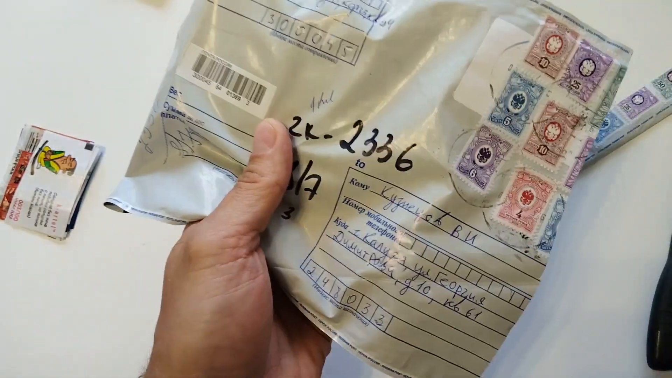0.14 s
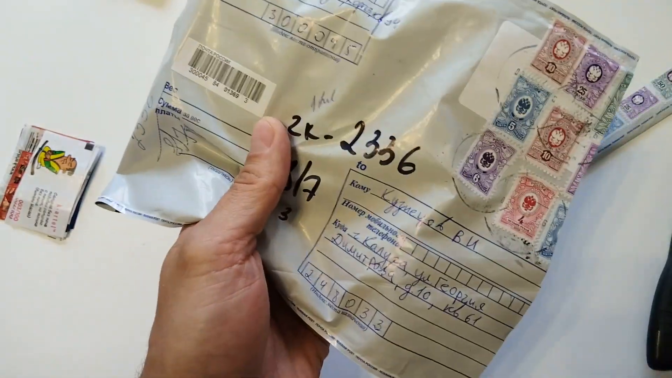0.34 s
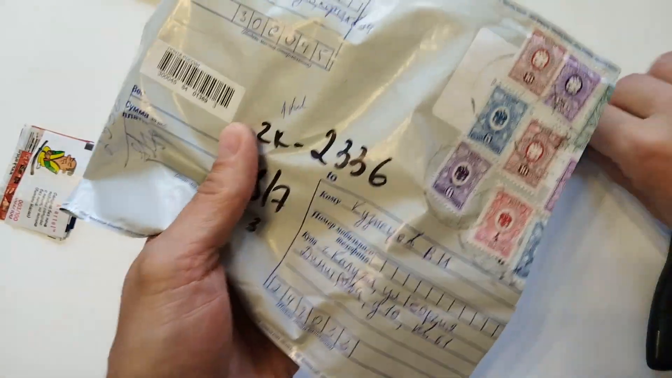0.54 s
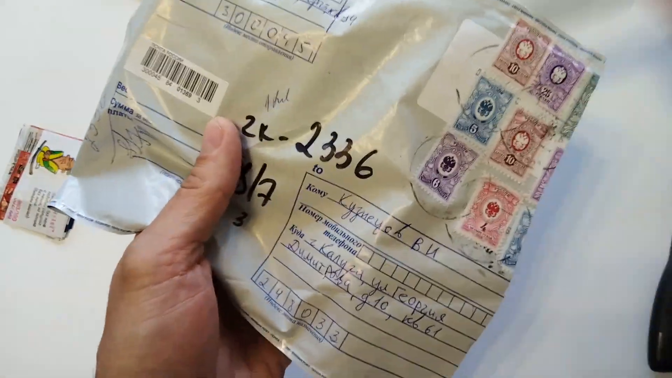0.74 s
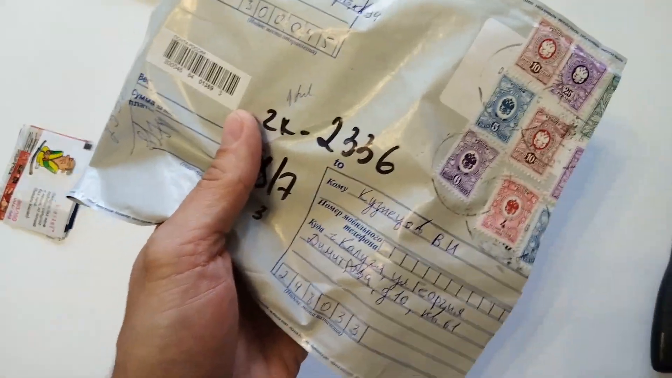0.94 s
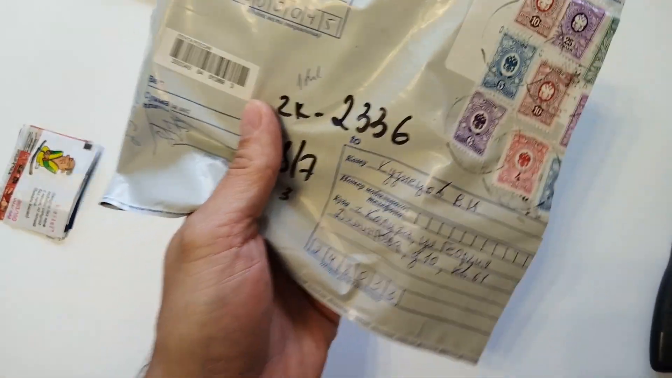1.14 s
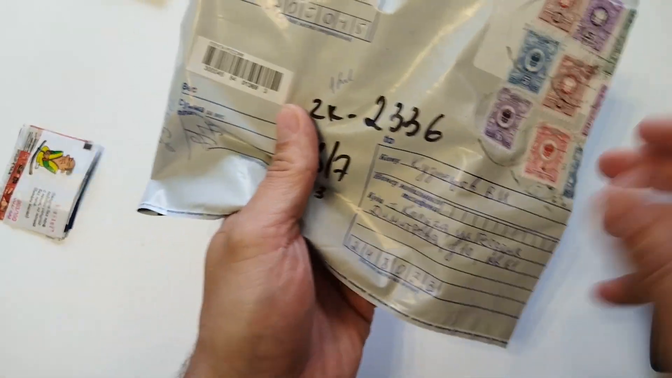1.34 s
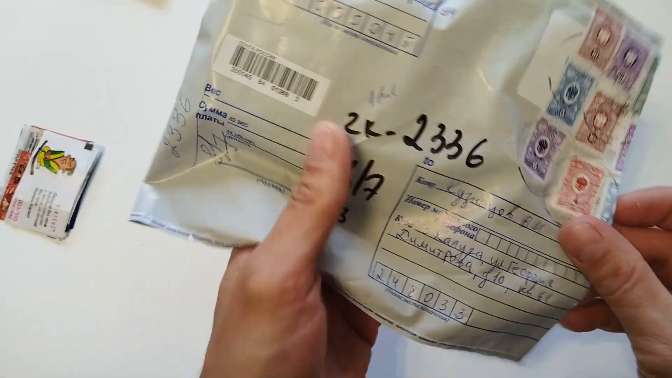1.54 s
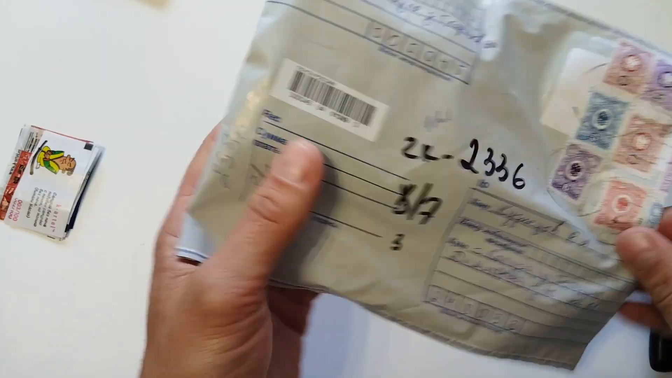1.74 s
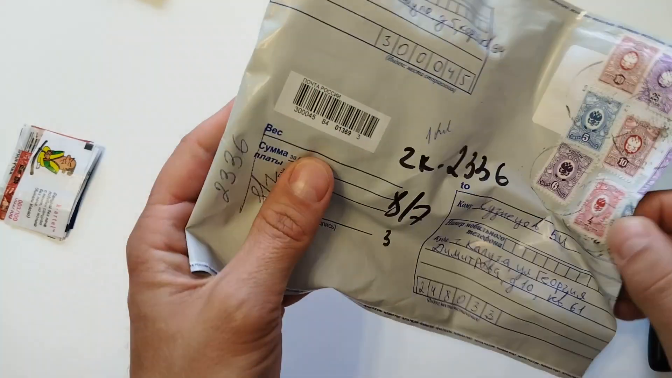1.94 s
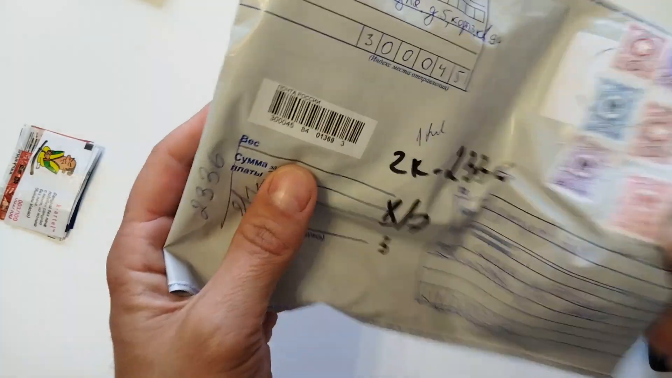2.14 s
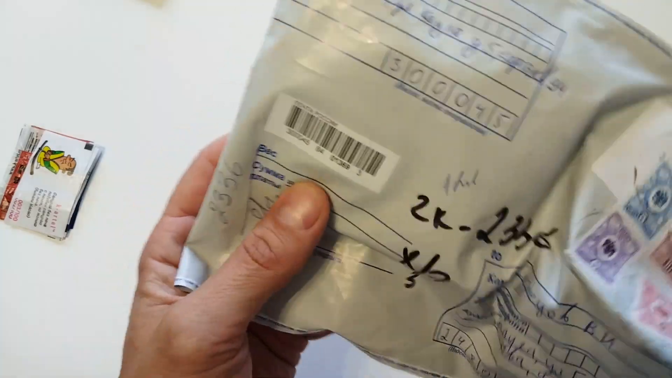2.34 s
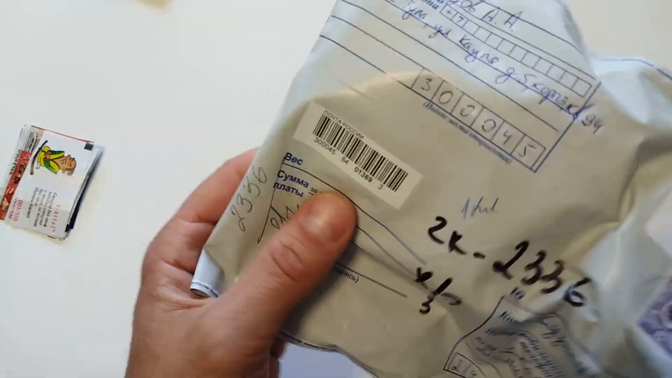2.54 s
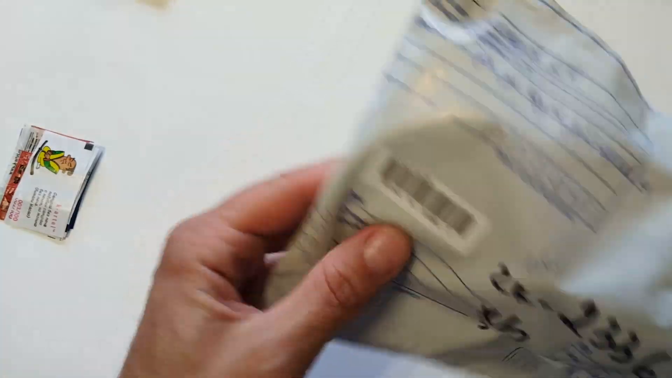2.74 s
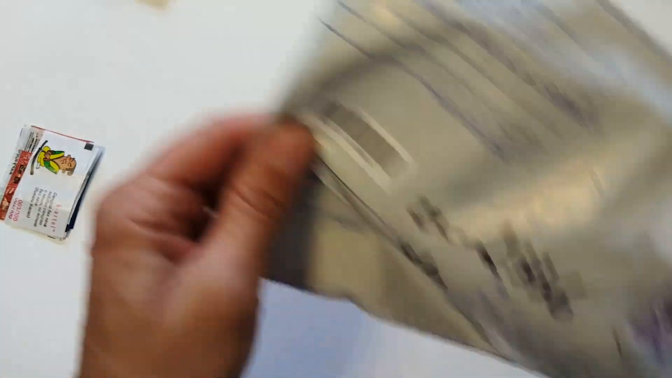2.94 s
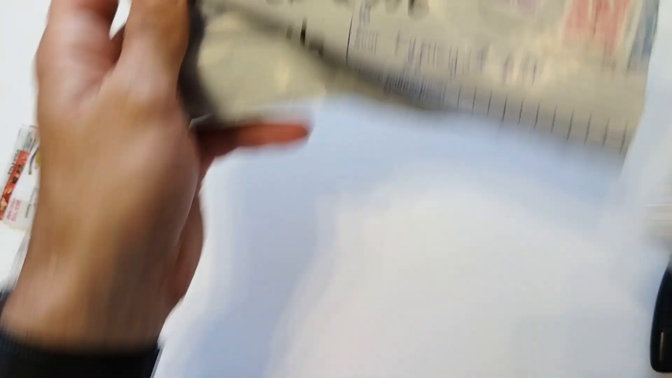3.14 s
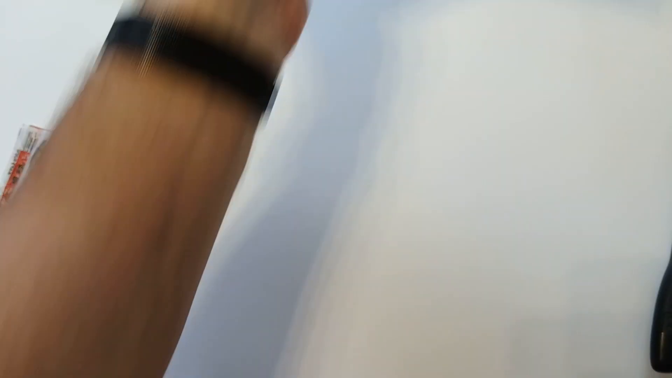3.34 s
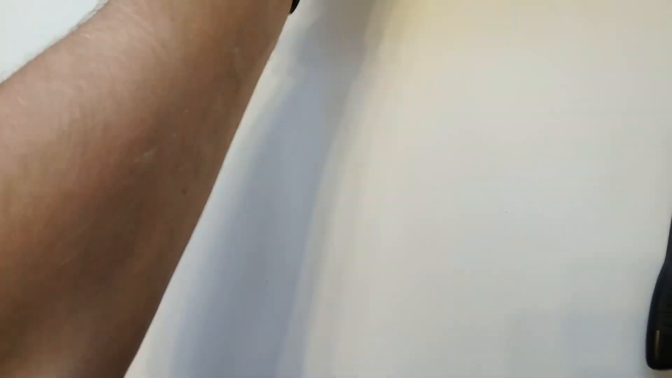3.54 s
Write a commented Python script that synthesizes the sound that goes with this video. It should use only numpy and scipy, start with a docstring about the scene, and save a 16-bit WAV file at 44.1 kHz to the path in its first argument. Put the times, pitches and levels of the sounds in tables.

```python
"""Stiff film rubs softly over a faint hum, then sharp clicks begin: a plastic mailer is turned over in the hands.
It is close to the microphone, above a table in a small bare room. Early on, something hard is put down on
the table: it clicks, rings the top and skids in a rush of small slips. Rubbing is filtered noise plus many tiny
clicks; creases snap as short noise bursts with a ringing note; slack parts pop with dull, hollow notes; a hollow
swish comes near the end. The clicks, pops, crackles, knocks and skid leave a short tail in the room."""
import sys
import numpy as np
from scipy import signal
from scipy.fft import rfft, irfft
from scipy.io import wavfile

SR = 44100
rng = np.random.default_rng(int(sys.argv[2]) if len(sys.argv) > 2 else 0)


def unload_audio(sound):
    """Save the sound as a 16-bit wav file, at the path given as the first command line argument."""
    columns = np.transpose(np.atleast_2d(sound))
    # keep every value between -1 and 1, then stretch to whole-number steps
    steps = np.round(np.clip(columns, -1, 1) * 32767)
    wavfile.write(sys.argv[1], SR, steps.astype(np.int16))


N = 160965
T = np.arange(N) / SR
MIC_LAG_S = 0.00017   # sets how far arrival times spread between the two microphones


def from_db(db):
    """Turn decibels into a gain."""
    return 10 ** (np.asarray(db) / 20)


def rms_one(x):
    """Scale a sound to an rms of one."""
    return x / np.sqrt(np.mean(x ** 2) + 1e-20)


def at_hz(points, hz):
    """Read a table between its points, on a log-frequency axis."""
    f, v = np.transpose(points)
    return np.interp(np.log(hz + 1e-3), np.log(f), v)


def band(x, low, high, order=3):
    """Keep only the frequencies between low and high."""
    sos = signal.butter(order, [low, high], "band", fs=SR, output="sos")
    return signal.sosfilt(sos, x + 1e-18)


def coloured(x, spectrum):
    """Shape a sound with a (Hz, dB) curve, through a minimum-phase filter that never rings early."""
    size = 4096
    gain = from_db(at_hz(spectrum, np.fft.rfftfreq(size, 1 / SR)))
    cepstrum = irfft(np.log(gain))
    # Folding the second half onto the first makes the filter causal.
    cepstrum[1:size // 2] *= 2
    cepstrum[size // 2 + 1:] = 0
    response = irfft(np.exp(rfft(cepstrum)))
    return signal.fftconvolve(np.atleast_2d(x), response[None], axes=1)[:, :x.shape[-1]]


# How alike left and right are. Each row: frequency in Hz, likeness from 0 (unrelated) to 1 (the same).
LIKENESS = [(60, 0.92), (130, 0.88), (290, 0.69), (640, 0.65), (1400, 0.27), (3100, 0.12), (15000, 0)]


def diffuse(size):
    """Stereo noise from all around: alike in the bass, unrelated in the treble."""
    mid, side = rfft(rng.standard_normal((2, size)))
    alike = np.clip(at_hz(LIKENESS, np.fft.rfftfreq(size, 1 / SR)), -1, 1)
    spectrum = np.sqrt(1 + alike) * mid + np.sqrt(1 - alike) * side * [[1], [-1]]
    return rms_one(irfft(spectrum, size))


def drift(rate):
    """A random wander with an rms of one, through this many new values a second."""
    knots = rng.standard_normal(2000)
    return rms_one(np.interp(T * rate, np.arange(len(knots)), knots))


def ring(clicks, hz, t60):
    """Each unit click sets off a sine of height about 1 that falls by 60 dB in t60 seconds."""
    r = 10 ** (-3 / (t60 * SR))
    w = 2 * np.pi * hz / SR
    return signal.lfilter([0, np.sin(w)], [1, -2 * r * np.cos(w), r * r], clicks + 1e-18)


def resonate(x, rings):
    """Feed a sound to side-by-side resonances of (Hz, width Hz, dB), added with alternating sign."""
    out = 0
    for k, (hz, width_hz, db) in enumerate(rings):
        b, a = signal.iirpeak(hz, hz / width_hz, fs=SR)
        out = out + (-1) ** k * from_db(db) * signal.lfilter(b, a, x + 1e-18)
    return out


def add(track, s, sound):
    """Mix a sound into a track at a time in seconds."""
    i = int(s * SR)
    track[i:i + len(sound)] += sound[:max(len(track) - i, 0)]


# Tone of the room air. Each row: frequency in Hz, relative level in dB per Hz.
AIR = [(30, -41), (60, -13.5), (120, -5.5), (240, 2.5), (350, -11), (480, -7), (720, -19), (2500, -29),
       (7600, -31.5), (9200, -55), (11300, -28.5), (15000, -27.5)]
# The steady hum. Each row: frequency in Hz, average rms level in dB.
HUM = [(194, -68), (242.2, -60), (484.5, -63)]
AIR_DB = -56


def background():
    """Room air is shaped noise; the faint hum is a few sines that waver together in level."""
    hum = 0
    for hz, db in HUM:
        hum = hum + np.sqrt(2) * from_db(db) * np.sin(2 * np.pi * (hz * T + rng.random()))
    air = from_db(AIR_DB) * rms_one(coloured(diffuse(N), AIR))
    return air + hum * from_db(1.1 * drift(5.2))


PATCHY_DB, PATCHES_PER_S = 4.5, 22   # as the sheet bends, its resonances come and go


def patchy(x, low, high, count=5):
    """Split a band into strips that swell and fade on their own as the sheet bends."""
    edges = np.geomspace(low, high, count + 1)
    out = 0
    for k in range(count):
        strip = band(x[k % 2], edges[k], edges[k + 1], order=2)   # the two noises take turns
        out = out + strip * from_db(PATCHY_DB * drift(PATCHES_PER_S))
    return rms_one(out)


CRACKLES_PER_S, CRACKLE_SPREAD_DB = 520, 3


def creases(size=6000):
    """Tiny creases give way at random: sample, strength and centre pitch of each, and its two mic delays."""
    gaps_s = rng.exponential(1 / CRACKLES_PER_S, size)
    born = (np.cumsum(gaps_s) * SR).astype(int)
    strength = from_db(CRACKLE_SPREAD_DB * np.minimum(rng.exponential(1, size), 2))
    centre_hz = np.exp(rng.uniform(np.log(100), np.log(16000), size))
    lags = (rng.random((2, size)) * MIC_LAG_S * SR).astype(int)
    return born, strength, centre_hz, lags


# Colour of the film, for its rubbing and for the sharp clicks. Each row: frequency in Hz, level in dB.
FILM = [(60, -7), (110, -0.5), (270, -4), (460, -2), (560, -3.5), (820, 2), (1070, 0.5), (1800, 1.5),
        (2500, 1.5), (2950, -4.5), (3700, -4), (5500, -4.5), (7400, -4), (9400, -19), (11600, -13),
        (13300, -19.5), (15000, -20)]
CRACKLE_CYCLES = 10.9   # cycles for a click's ringing to fall by 60 dB
CRACKLE_OCTAVES = .55   # spread of one tiny crease's spectrum around its pitch


def crackle(tiny, low, high, count=10):
    """Each tiny crease is one click that rings the film's modes around its own pitch, with its own strengths."""
    born, strength, centre_hz, lags = tiny
    out = np.zeros((2, N))
    for hz in np.geomspace(low, high, count * 2 + 1)[1::2]:
        shared, own = rng.standard_normal(len(born)), rng.standard_normal((2, len(born)))
        alike = np.clip(at_hz(LIKENESS, hz), 0, 1)
        clumps = from_db(PATCHY_DB * drift(PATCHES_PER_S)[np.minimum(born, N - 1)])
        nearness = np.exp(-.5 * (np.log2(hz / centre_hz) / CRACKLE_OCTAVES) ** 2)
        reach = strength * clumps * nearness
        for side in range(2):
            weight = reach * (np.sqrt(alike) * shared + np.sqrt(1 - alike) * own[side])
            # Clicks past the end of the scene fall into slot N, which is dropped.
            clicks = np.bincount(np.minimum(born + lags[side], N), weight, N)[:N]
            out[side] += hz * ring(clicks, hz, CRACKLE_CYCLES / hz)
    return rms_one(band(coloured(out, FILM), low, high))


# How hard the film rubs, before flutter and the hiss and crackle shares below.
# Each row: time in seconds, then level in dB in each of the four rub bands.
RUB = [(0, -61, -47.5, -45.5, -49.5), (0.171, -61, -56, -62.5, -79), (0.26, -53, -53.5, -36, -46),
       (0.72, -69, -57, -56.5, -72), (0.848, -43, -47, -36.5, -44.5), (0.92, -50.5, -62, -52.5, -62),
       (1.0, -48, -56, -42.5, -50), (1.121, -63, -64.5, -76, -90), (1.22, -68, -73.5, -66, -60),
       (1.313, -75, -73, -66, -71), (1.321, -58, -51, -41.5, -44.5), (1.42, -58.5, -52, -37, -39.5),
       (1.57, -70, -56, -59, -70), (1.72, -67, -64.5, -61, -59), (1.819, -50.5, -45.5, -45, -51),
       (1.89, -46, -38.5, -34.5, -39.5), (2.05, -59, -41, -41, -46.5), (2.15, -57, -45, -55.5, -64),
       (2.23, -57.5, -40, -34.5, -40), (2.39, -50.5, -45.5, -43.5, -54.5),
       (2.551, -40, -29.5, -35.5, -44.5), (2.71, -45, -49, -54, -43), (2.771, -34.5, -27.5, -24, -38.5),
       (2.84, -53.5, -35.5, -46, -46.5), (2.951, -40, -36, -37, -46), (3.03, -46, -33, -32.5, -39.5),
       (3.11, -41, -36, -38, -52.5), (3.23, -44.5, -33.5, -34, -38.5), (3.362, -45, -36, -31, -39),
       (3.499, -54, -52.5, -45.5, -58.5), (3.65, -66, -60, -54.5, -63)]
# The rub bands. Each row: lowest and highest frequency in Hz.
RUB_BANDS_HZ = [(70, 500), (500, 2800), (2800, 8000), (8000, 15500)]
# Share of smooth friction: one level in dB for each rub band.
HISS_DB = [-2.5, -7.5, -5.5, -1.5]
# Share of tiny creases: one level in dB for each rub band.
CRACKLE_DB = [-4.5, -5.5, -8, -5]
FLUTTER_DB = 1.83


def rubbing():
    """Film slides over fingers and over itself: returns the smooth hiss and the crackle that rides on it."""
    s, *levels = np.transpose(RUB)
    friction = [coloured(diffuse(N), FILM) for _ in range(2)]
    flutter = from_db(FLUTTER_DB * drift(70))
    hiss = grains = 0
    tiny = creases()
    for (low, high), db, hiss_db, crackle_db in zip(RUB_BANDS_HZ, levels, HISS_DB, CRACKLE_DB):
        gain = from_db(np.interp(T, s, db)) * flutter
        hiss = hiss + gain * from_db(hiss_db) * patchy(friction, low, high)
        grains = grains + gain * from_db(crackle_db) * crackle(tiny, low, high)
    return hiss, grains


# Sharp broadband clicks: creases snapping, and four hard contacts of the object on the table (0.29 to 0.51 s).
# Each row: time of the pulse in seconds, pitch in Hz, left minus right in dB,
# then level in dB in each of the four click bands (as rms over 4 ms, before panning).
CLICKS = [(0.2109, 7940, -2, -42, -56, -26.5, -27), (0.2927, 2580, 5, -26, -28.5, -26.5, -25.5),
          (0.3093, 920, -5.5, -40, -26.5, -28.5, -33), (0.394, 1190, 4, -39, -34, -29.5, -34),
          (0.4393, 1150, 2.5, -18.5, -21.5, -23, -24), (0.512, 910, 3, -23.5, -50, -31, -29.5),
          (0.656, 7400, 6, -61, -44, -38, -39.5), (0.7455, 5700, 4, -71, -70, -39, -37.5),
          (1.0194, 6700, 4, -78, -76, -44.5, -40), (1.417, 5550, -1, -57, -47, -39, -31.5),
          (1.4558, 7870, -0.5, -45, -40, -23, -25.5), (1.8499, 7100, -2, -35.5, -46.5, -34, -33),
          (1.8641, 6270, 1.5, -33, -31.5, -24, -29.5), (1.9146, 4480, -1.5, -34, -35, -30.5, -35),
          (2.0005, 4520, 4, -35.5, -36, -32.5, -54), (2.0171, 3730, 2, -37, -44, -37.5, -52),
          (2.1034, 1690, 0, -43, -28, -30, -43), (2.1718, 2800, -1, -35, -34, -35.5, -40),
          (2.191, 3530, 0, -37.5, -50, -30.5, -47), (2.2107, 11200, -1, -45, -36, -27.5, -17.5),
          (2.2205, 6460, -4, -40, -38, -25.5, -42), (2.2475, 4140, 0, -53, -44, -31, -30),
          (2.3418, 4330, -1.5, -37.5, -37, -28, -38), (2.429, 3220, -1, -38, -36, -31.5, -45),
          (2.4407, 1720, 2, -45, -30, -27.5, -42), (2.517, 1780, 2, -31.5, -35, -34, -39),
          (2.5986, 1565, -2.5, -43, -17, -28.5, -44), (2.617, 1720, 3, -32.5, -24.5, -26.5, -26),
          (2.6409, 5650, -1.5, -28.5, -29, -14.5, -28), (2.7617, 2340, -3, -29.5, -32, -49, -33),
          (2.7706, 1810, -3, -29, -30, -38, -42), (2.774, 1870, 3, -46, -25.5, -24, -26.5),
          (2.835, 2320, -10, -40, -31.5, -36, -46), (2.8651, 2250, 0, -49, -30, -31, -27),
          (2.9043, 5470, 2.5, -27, -24.5, -20.5, -29.5), (2.9591, 1650, 1.5, -34, -25.5, -42, -55),
          (2.9709, 680, 0.5, -26.5, -29.5, -43, -53), (3.0785, 1950, 7, -52, -27, -36, -46),
          (3.1436, 7150, 1, -31, -21, -18, -47), (3.147, 3280, 1, -42, -32, -23, -47),
          (3.222, 1240, 4, -37, -30, -31, -48), (3.2895, 5650, -2, -49, -32, -23.5, -23),
          (3.5904, 11200, 7.5, -66, -57, -42, -39), (3.636, 7900, 10, -73, -71, -49, -42)]
# The click bands. Each row: lowest and highest frequency in Hz.
CLICK_BANDS_HZ = [(400, 1200), (1200, 2800), (2800, 8000), (8000, 15500)]
RISE_S, LEAD_S = 0.0003, .005   # time constant of the onset, and length of the lead-in
CRACK_S, FLAP_S = 0.00069, 0.0042   # time constants: a sharp crack, then a brief, softer flapping tail
# A faint noise swell leads into the single pulse; tails differ from click to click.
LEAD_NOISE_DB, PULSE_DB, FLAP_DB, FLAP_SPREAD_DB = -13, 14.5, -3, 3.5
NOTE_DB, NOTE_CYCLES = -1.5, 23.7   # the ringing note; cycles to fall by 60 dB
# The further a click stands above the rubbing, the weaker its lead-in noise and its tail.
LONE_DB, CLEAN_DB_PER_DB = 17.5, 0.34


def sharp_clicks():
    """A faint noise swell leads into one pulse and a short crack, with a ringing note and a brief tail."""
    out = np.zeros((2, N))
    t = np.arange(SR // 40) / SR - LEAD_S   # the pulse is at zero
    after = np.maximum(t, 0)
    lead_noise = (t < 0) * from_db(LEAD_NOISE_DB) * (1 + t / LEAD_S)
    rise = np.exp(np.minimum(t, 0) / RISE_S)
    pulse = from_db(PULSE_DB) * (np.arange(len(t)) == np.argmax(t >= 0))
    reference = .004 * SR
    rub_s, _, _, rub_treble_db, _ = np.transpose(RUB)
    for s, hz, pan_db, *levels in CLICKS:
        above_db = max(levels) - np.interp(s, rub_s, rub_treble_db)
        looseness = from_db(np.clip(CLEAN_DB_PER_DB * (LONE_DB - above_db), -20, 2))
        flap = looseness * from_db(FLAP_DB + FLAP_SPREAD_DB * rng.standard_normal())
        fall = np.exp(-after / CRACK_S) + flap * np.exp(-after / FLAP_S)
        shape = looseness * lead_noise + rise * fall
        shared, own = rng.standard_normal(len(t)), rng.standard_normal((2, len(t)))
        lag = abs(rng.normal(0, MIC_LAG_S / 3, 2))
        note = rms_one(np.sin(2 * np.pi * hz * after) * from_db(-60 * after * hz / NOTE_CYCLES))
        # "apart" is how much left and right differ; it grows towards the treble.
        for (low, high), db, apart in zip(CLICK_BANDS_HZ, levels, [.2, .45, 1.2, 1.8]):
            noise = (shared + apart * own) * shape
            crack = rms_one(band(coloured(pulse + noise, FILM), low, high))
            burst = crack + (low <= hz < high) * from_db(NOTE_DB) * note   # only in the band of its pitch
            burst *= from_db(db) * np.sqrt(2 * reference / np.sum(burst ** 2))
            for side, sign in enumerate((1, -1)):
                panned = burst[side] * from_db(sign * pan_db / 2)
                add(out[side], s - LEAD_S + lag[side], panned)
    return out


# Notes rung by blows on the table: the two lowest (104 and 127.2 Hz) are modes of the room, the rest belong to
# the table top. Each row: frequency in Hz, level in dB, time to fall by 60 dB in seconds.
KNOCK_MODES = [(104, 3.5, 0.3), (127.2, -1.5, 0.49), (182, -3, 0.36), (276.6, -1, 0.18), (430.4, -15, 0.36),
               (475, -17, .25), (827, -2.5, 0.089), (870, 5, 0.1), (932, -7.5, 0.09), (1282, -10, 0.15)]
# Blows on the table. Each row: time in seconds, strength in dB, softness as a low-pass in Hz (lower is softer).
KNOCKS = [(.292, -26, 1790), (0.3109, -30, 1400), (0.4357, -26.5, 1800), (0.514, -39, 1220),
          (0.7473, -25, 118), (1.004, -51, 614), (1.09, -44.5, 149)]
MIC_LOW_CUT_HZ = 102


def knocks():
    """Blows ring the table top and the room's lowest modes; a soft blow reaches only the low notes."""
    s, db, soft_hz = np.transpose(KNOCKS)
    out = 0
    for hz, mode_db, t60 in KNOCK_MODES:
        strength = from_db(db + mode_db) / np.sqrt(1 + (hz / soft_hz) ** 4)
        clicks = np.bincount((s * SR).astype(int), strength, N)
        out = out + ring(clicks, hz, t60)
    low_cut = signal.butter(4, MIC_LOW_CUT_HZ, "high", fs=SR, output="sos")
    return signal.sosfilt(low_cut, [out, out])


# Harder catches in the skid. Each row: time in seconds, strength in dB against the largest ordinary slip.
SKID_CATCHES = [(0.435, 2.4), (.439, 12.2), (0.511, 1.9), (.531, 2.3)]
# Resonances that the skid excites. Each row: frequency in Hz, width in Hz, level in dB.
SKID_RINGS = [(664, 140, -6.5), (788, 49, 5), (860, 46, 7), (1256, 65, 10), (1565, 63, -0.5), (1758, 67, 5),
              (1880, 62, -8.5)]
# Overall tone of the skid. Each row: frequency in Hz, level in dB.
SKID_COLOUR = [(70, -45), (110, -3.5), (190, 0.5), (600, 2), (900, -6.5), (1900, 2), (2300, -7.5),
               (2900, -13.5), (5000, -22), (12000, -46)]
SKID_START_S, SKID_LENGTH_S, SKID_DB, SLIPS_PER_S = .435, .104, -23, 840
SKID_BROAD_DB = -6   # the bare slips, mixed with the resonances


def skid():
    """A hard object judders over the table: dense slips, and a few harder catches, into its resonances."""
    sliding = (T > SKID_START_S) & (T < SKID_START_S + SKID_LENGTH_S)
    slips = sliding * (rng.random(N) < SLIPS_PER_S / SR)
    slips = slips * rng.uniform(0.32, 1, N) * rng.choice([-1, 1], N)
    for s, db in SKID_CATCHES:
        add(slips, s, from_db([db]))
    mix = from_db(SKID_BROAD_DB) * slips + resonate(slips, SKID_RINGS)
    body = coloured(mix, SKID_COLOUR)[0]
    body *= from_db(SKID_DB) / body[sliding].std()
    return np.array([body, np.roll(body, int(MIC_LAG_S * SR))])   # the right side hears it later


# Slack parts popping over with a dull, hollow note. Each row: time in seconds, pitch in Hz, push in dB.
POPS = [(1.0034, 440, -31), (2.058, 900, -26.5), (2.104, 650, -28), (2.217, 935, -23.5), (2.506, 99, -40),
        (2.691, 474, -25.5), (2.728, 479, -25.5), (2.76, 138, -30.5), (2.942, 690, -23.5)]
POP_CYCLES, POP_OVERTONE = 8.1, 1.55   # cycles of pitch to fall by 60 dB; pitch ratio of the weaker second mode


def pops():
    """A slack panel pops over and rings for a few cycles in two modes."""
    out = np.zeros(N)
    for s, hz, db in POPS:
        push = signal.unit_impulse(SR // 5) * from_db(db)
        main = ring(push, hz, POP_CYCLES / hz)
        overtone = ring(push, hz * POP_OVERTONE, POP_CYCLES / hz)
        add(out, s, main - .5 * overtone)
    return np.array([out, out])


# The mailer brushes the table as it is laid down. Each row: time in seconds, level in dB.
BRUSH = [(3.15, -82), (3.3, -39), (3.55, -52.5), (3.65, -77)]
# What rings as it brushes. Each row: frequency in Hz, width in Hz, level in dB.
BRUSH_RINGS = [(457, 57, 0), (1480, 130, -3), (1720, 110, -0.5)]


def brush():
    """A hollow swish as the mailer slides onto the table: noise through a few resonances."""
    level = from_db(np.interp(T, *np.transpose(BRUSH)))
    return level * rms_one(resonate(diffuse(N), BRUSH_RINGS))


# How long the room rings. Each row: frequency in Hz, time to fall by 60 dB in seconds.
ROOM_T60 = [(100, 0.53), (400, 0.46), (1500, 0.44), (5000, 0.5), (14000, 0.24)]
ROOM_DELAY_S = 0.0077


def room(x):
    """Dense reflections, made of noise, that die away band by band."""
    size = SR * 3 // 4
    t, noise = np.arange(size) / SR, diffuse(size)
    edges = np.geomspace(60, 18000, 9)
    tail = 0
    for low, high in zip(edges, edges[1:]):
        t60 = at_hz(ROOM_T60, np.sqrt(low * high))
        tail = tail + band(noise, low, high) * from_db(-60 * t / t60)
    tail = tail * (t > ROOM_DELAY_S)
    tail /= np.sqrt(np.sum(tail ** 2) / 2)
    return signal.fftconvolve(x, tail, axes=1)[:, :N]


# How much of each source the room returns
CLICK_WET_DB, CRACKLE_WET_DB, KNOCK_WET_DB, SKID_WET_DB = -8.5, -10, -5, -2.5


def scene():
    """Mailer and table, direct and through the room, over the background."""
    hiss, grains = rubbing()
    sources = [(grains, CRACKLE_WET_DB), (sharp_clicks() + pops(), CLICK_WET_DB),
               (knocks(), KNOCK_WET_DB), (skid(), SKID_WET_DB)]
    direct = hiss + brush() + sum(x for x, _ in sources)
    echoes = room(sum(x * from_db(db) for x, db in sources))
    return direct + echoes + background()


CUTOFF_HZ = 15300


def record(dry):
    """Peaks are clipped at full scale, then the top of the treble is cut steeply."""
    low_pass = signal.ellip(10, .2, 80, CUTOFF_HZ, fs=SR, output="sos")
    return signal.sosfilt(low_pass, np.clip(dry, -1, 1))


dry = scene()
out = record(dry)
unload_audio(out)
```